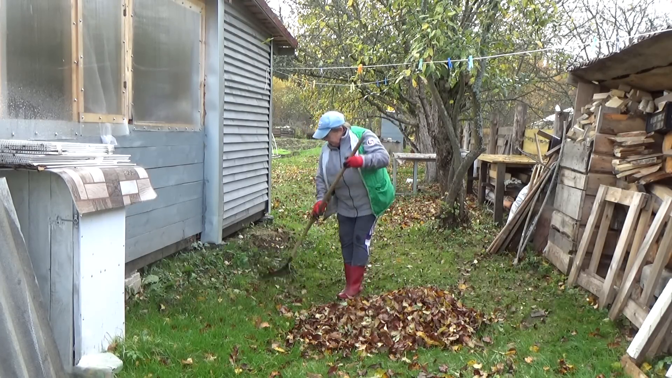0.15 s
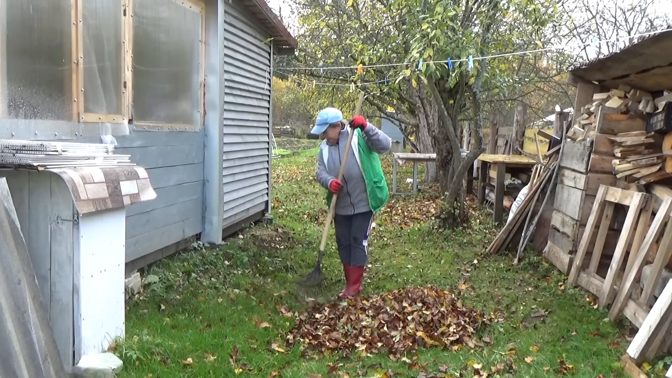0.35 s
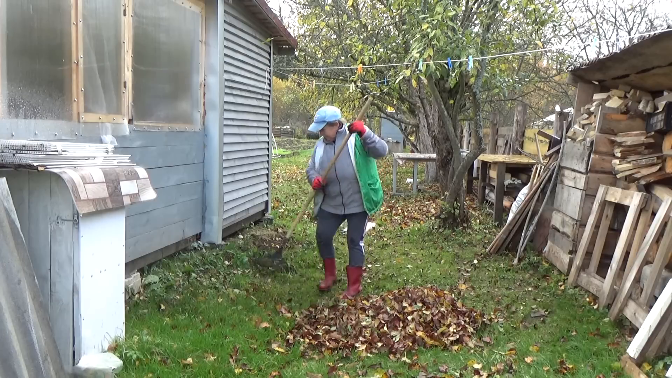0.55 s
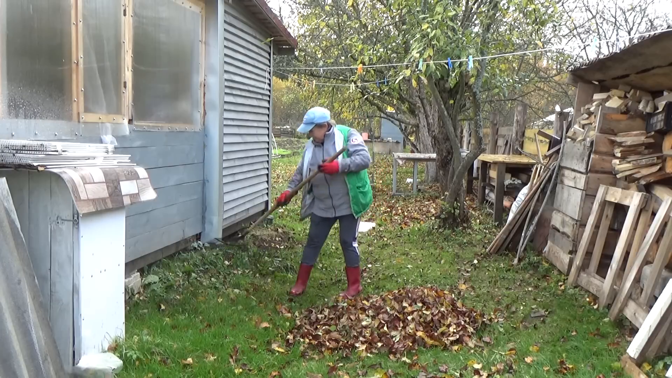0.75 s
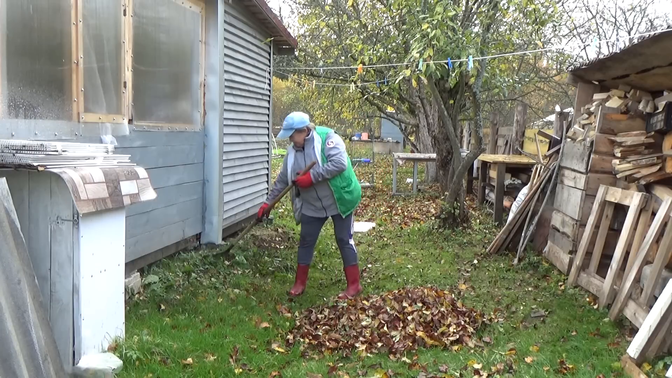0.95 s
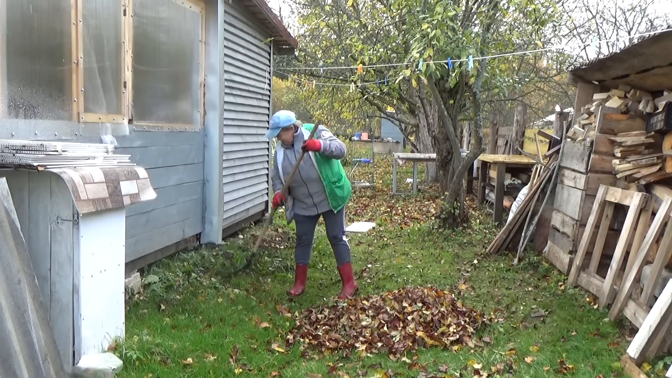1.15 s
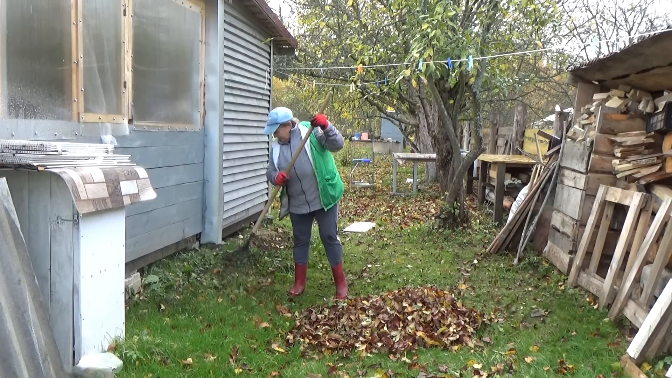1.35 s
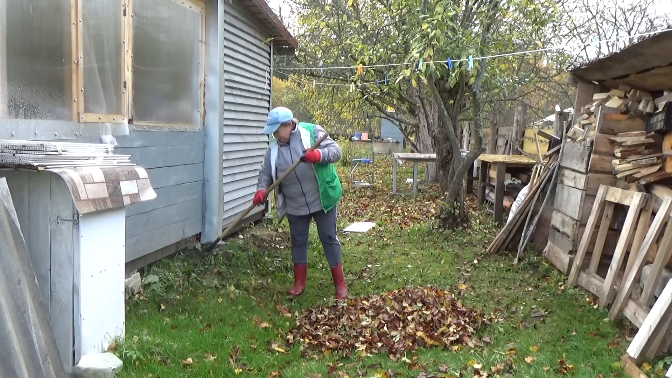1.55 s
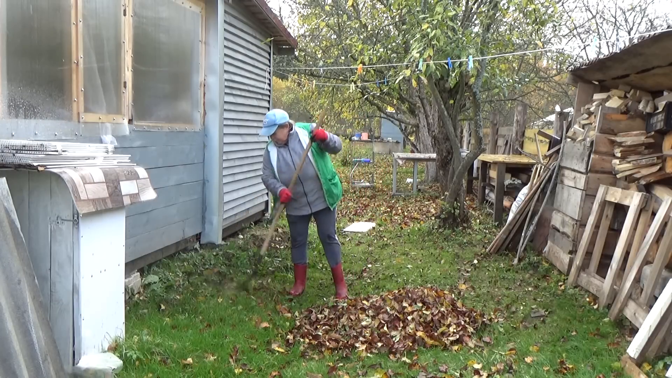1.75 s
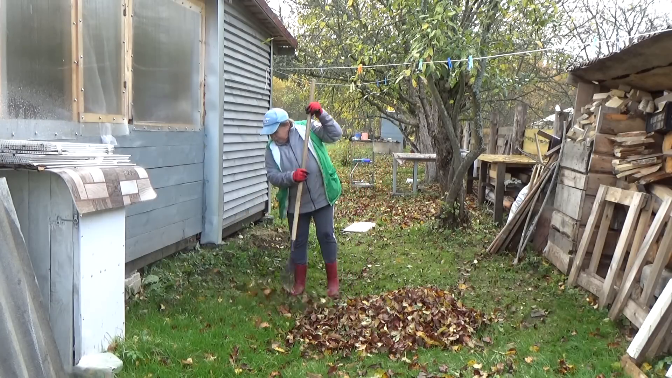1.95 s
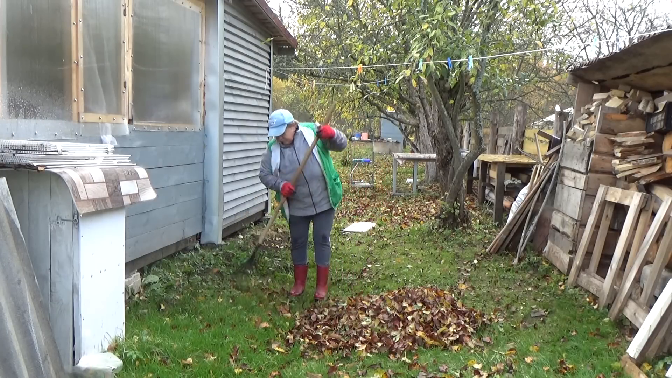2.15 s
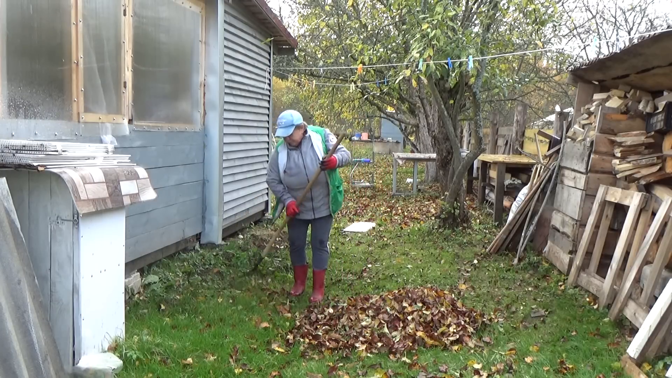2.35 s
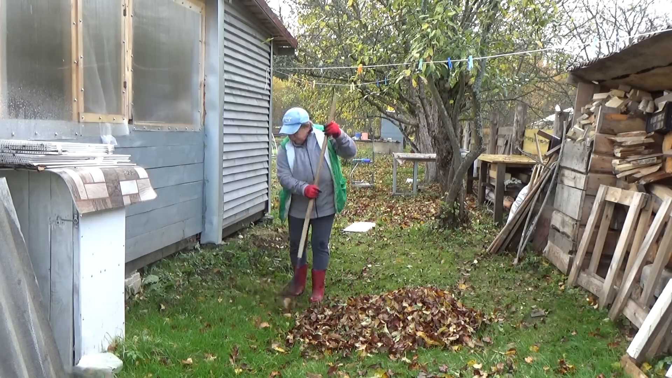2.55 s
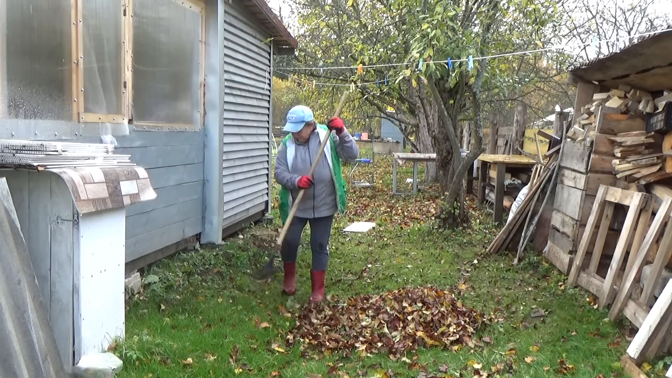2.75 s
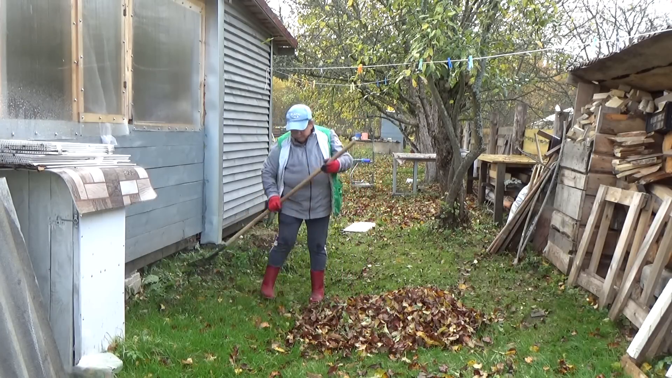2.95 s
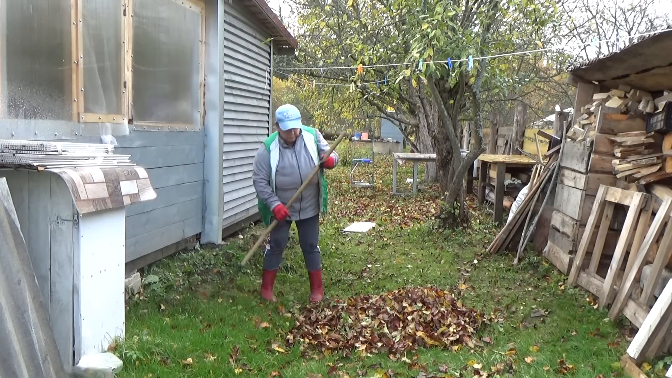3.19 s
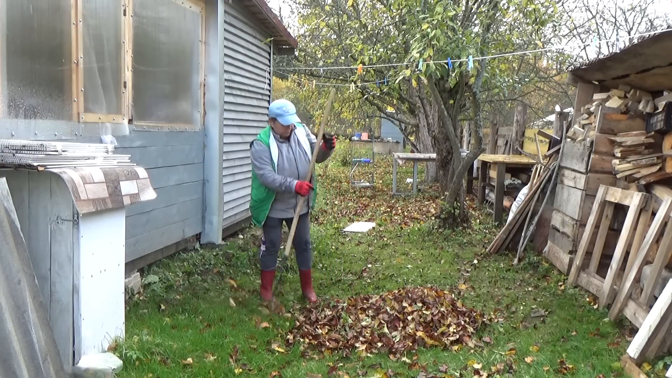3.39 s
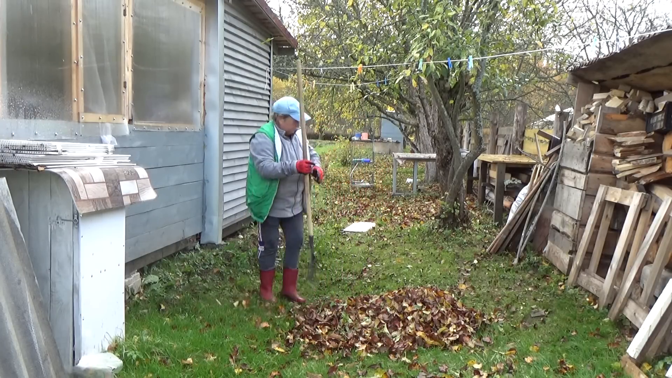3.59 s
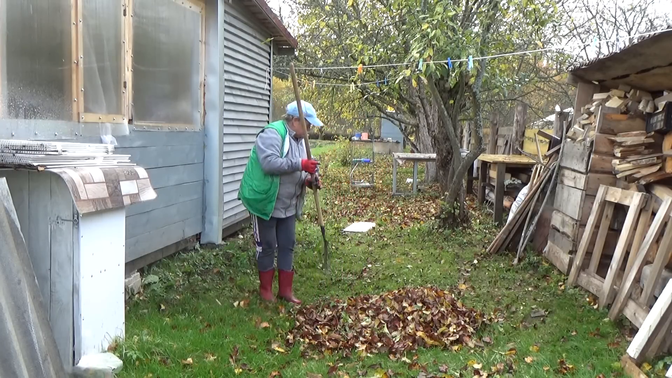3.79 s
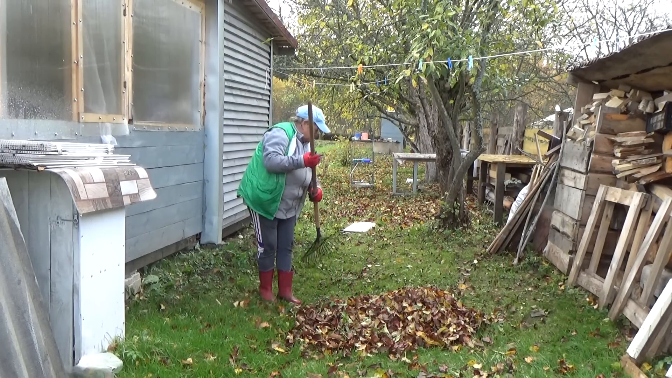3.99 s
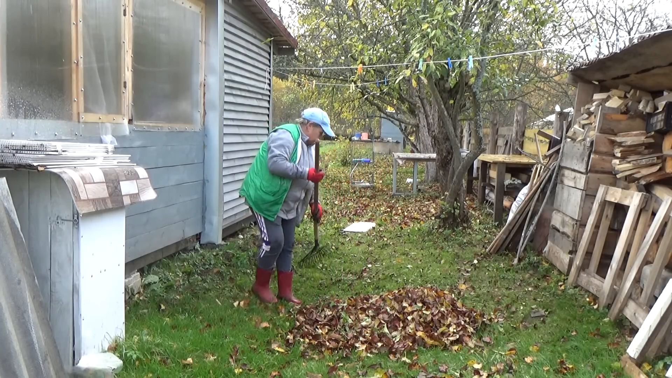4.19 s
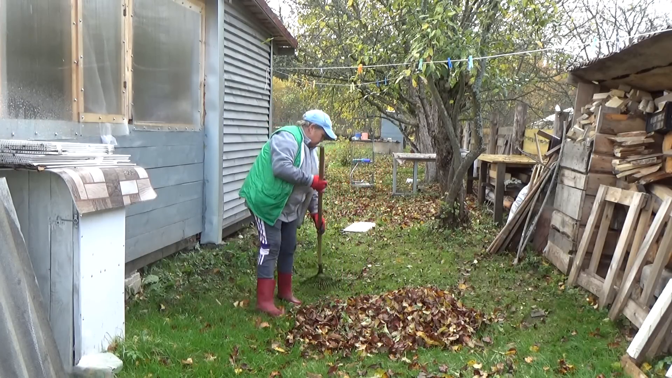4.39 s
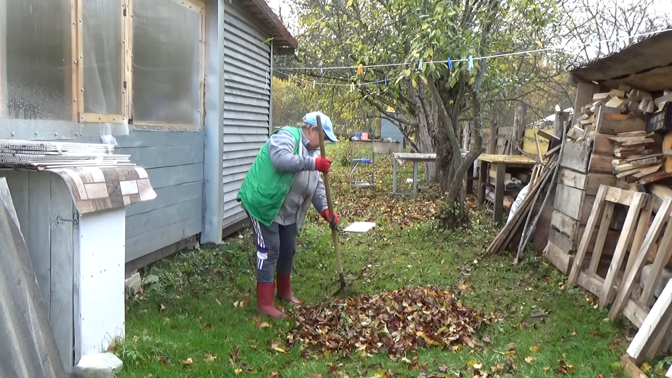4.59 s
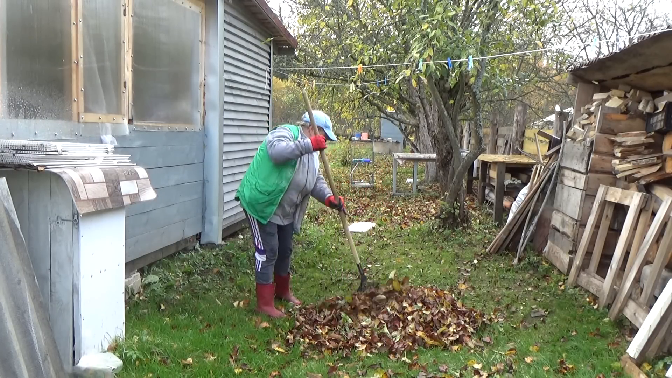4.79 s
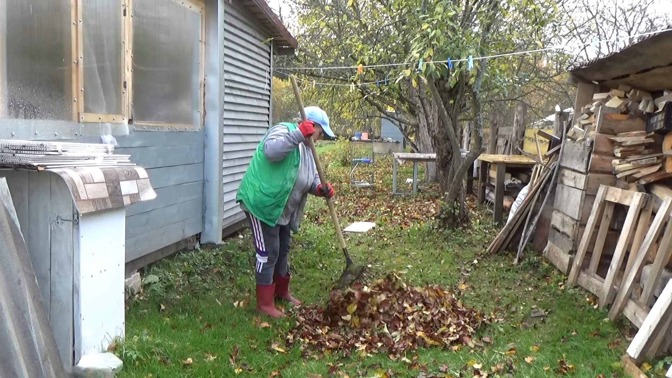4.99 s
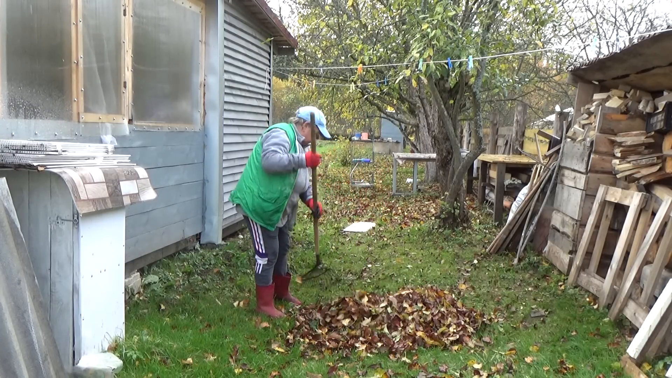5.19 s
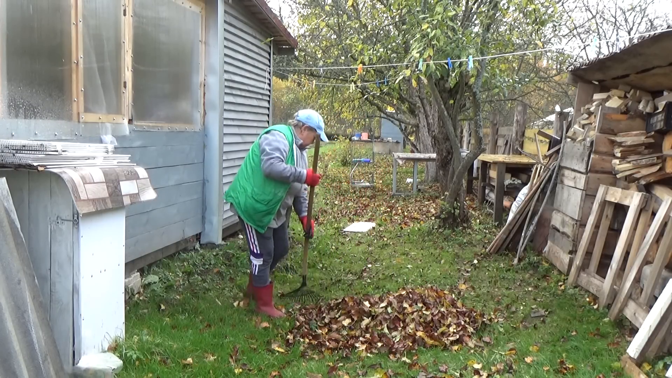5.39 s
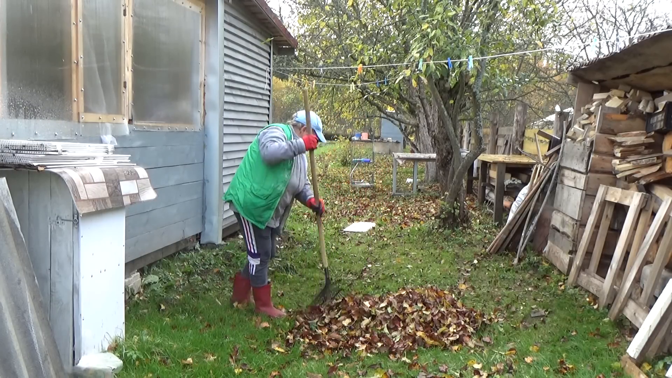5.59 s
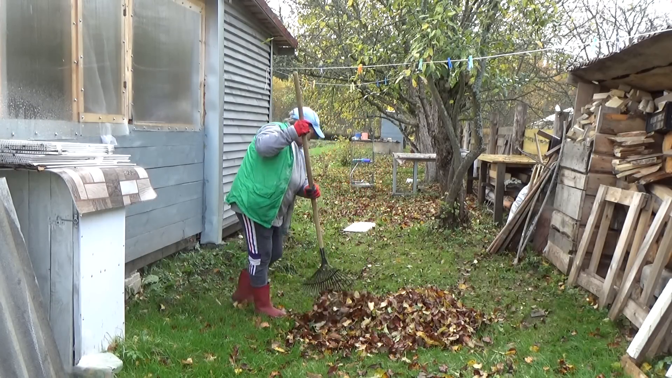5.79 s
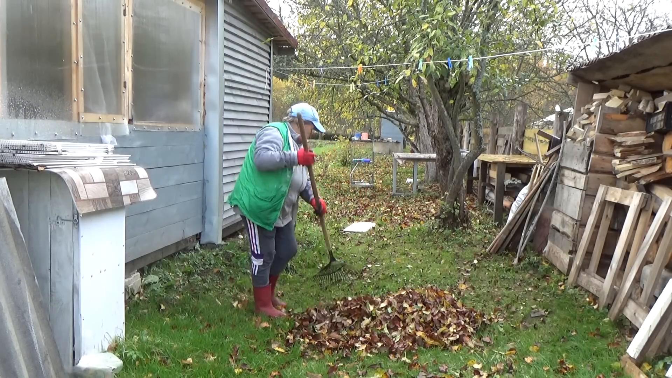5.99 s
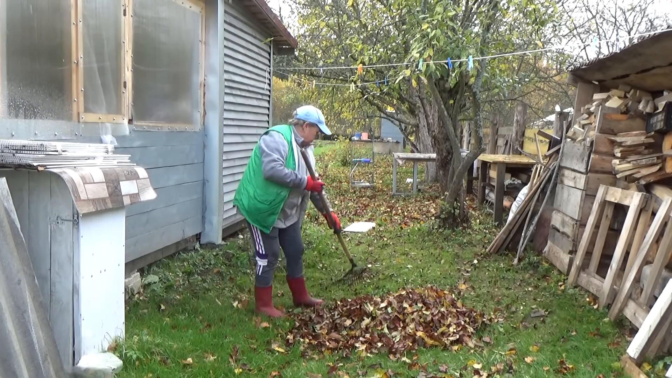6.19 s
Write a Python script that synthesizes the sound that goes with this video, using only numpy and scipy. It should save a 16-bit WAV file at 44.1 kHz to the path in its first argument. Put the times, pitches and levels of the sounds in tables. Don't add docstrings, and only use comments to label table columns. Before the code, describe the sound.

A wire rake scrapes through dry leaves and grass in crisp, crackling strokes, twigs snapping, over faint quiet garden air outdoors.

```python
import sys
import numpy as np
from scipy import signal
from scipy.fft import rfft, irfft, next_fast_len
from scipy.io import wavfile
from scipy.ndimage import uniform_filter1d, map_coordinates

SR = 44100
rng = np.random.default_rng(int(sys.argv[2]) if len(sys.argv) > 2 else 0)


def magnitude_from_level(level_db):
    exponent = np.asarray(level_db, float) / 20
    return 10 ** exponent


def waveform_to_disk(signal):
    frames = np.transpose(np.atleast_2d(signal))
    scaled = np.clip(frames, -1, 1) * 32767
    samples = np.round(scaled).astype(np.int16)
    wavfile.write(sys.argv[1], SR, samples)


N = 275184


def unit(x):
    return x / np.sqrt(np.mean(x ** 2) + 1e-20)


def along(points, hz):
    f, v = np.transpose(points)
    return np.interp(np.log(hz + 1), np.log(f + 1), v)


def wobble(rate):
    knots = rng.standard_normal(int(N * rate / SR) + 4)
    return map_coordinates(knots, [np.arange(N) * rate / SR])


def coloured(x, spectrum):
    m = next_fast_len(N + 8192)
    gain = magnitude_from_level(along(spectrum, np.fft.rfftfreq(m, 1 / SR)))
    return irfft(rfft(x, m) * gain, m)[..., :N]


def patchy(x, depth_db):
    z = signal.stft(x, nperseg=512)[2]
    field = rng.standard_normal(z.shape[1:])
    field = uniform_filter1d(uniform_filter1d(field, size=5, axis=0), size=5, axis=1)
    return unit(signal.istft(z * magnitude_from_level(depth_db * unit(field)), nperseg=512)[1][:, :N])


def grains(seconds, hz, turns, gain, size):
    cycle = hz[:, None] * np.arange(size) / SR
    soft_start = 1 - np.exp(-cycle / 0.46)
    shape = gain[:, None] * np.sin(2 * np.pi * cycle) * np.exp(-cycle / turns) * soft_start
    at = ((seconds * SR).astype(int)[:, None] + np.arange(size)).ravel()
    lean = rng.standard_normal(len(seconds))[:, None]
    return np.array([np.bincount(at, g.ravel(), N + size)[:N] for g in (shape, lean * shape)])


def burst(s, db, hz, t60, width, crack_db):
    t = np.arange(SR // 5) / SR
    b, a = signal.iirpeak(hz, 1 / width, SR)
    crack_band = signal.butter(2, [1200, 9000], "band", fs=SR)
    ring, broad = rng.standard_normal((2, 2, len(t)))
    ring = unit(signal.lfilter(b, a, signal.lfilter(b, a, ring)))
    crack = unit(signal.lfilter(*crack_band, broad))
    decay = magnitude_from_level(db - 60 * (t / t60) ** 0.99)
    onset = 1 - np.exp(-t / 0.00076)
    out = np.zeros((2, N + len(t)))
    start = round(s * SR)
    out[:, start:start + len(t)] = decay * onset * (ring + magnitude_from_level(crack_db) * crack)
    return out[:, :N]


def air():
    # frequency in Hz, level in dB per Hz.
    air_spectrum = [(12, -38), (20, -3), (70, 2), (700, 2.5), (3100, 0.5), (6050, -3), (9710, -5),
                    (15600, -15.5)]
    # frequency in Hz, side minus mid in dB.
    air_width = [(40, -25), (150, -10.5), (600, -2), (2000, -5), (5000, -11.5), (8800, -11), (9600, -15),
                 (11000, -40)]
    breath = magnitude_from_level(-68 + 1.3 * wobble(3.6))
    mid, side = breath * patchy(coloured(rng.standard_normal((2, N)), air_spectrum), depth_db=0.66)
    return np.array([mid, coloured(side, air_width)])


def yard(x):
    # frequency in Hz, decay time t60 in seconds.
    yard_decay = [(200, 0.53), (2000, 0.15), (12000, 0.043)]
    hz, t, z = signal.stft(rng.standard_normal((2, SR // 3)), SR, nperseg=256)
    fade = magnitude_from_level(-60 * t / along(yard_decay, hz)[:, None])
    tail = signal.istft(z * fade, SR, nperseg=256)[1]
    delayed = np.pad(x, (500, 0))[None]
    return signal.fftconvolve(delayed, tail / np.linalg.norm(tail[0]), axes=1)[:, :N]


def boots():
    # start in seconds, peak level in dB, pitch in Hz, decay time t60 in seconds.
    pushes = [
        (0.264, -60, 85, 0.18),
        (.768, -48.5, 280, 0.031),
        (1.712, -48, 480, 0.081),
        (2.545, -49, 403, 0.11),
        (3.04, -63, 62, 0.083),
        (3.219, -63, 185, 0.17),
        (4.64, -55.5, 203, .12),
        (4.7, -45, 526, 0.066),
        (5.566, -56, 88.5, 0.089),
    ]
    return sum(burst(s, db - 2.5, hz, t60, width=0.98, crack_db=-40) for s, db, hz, t60 in pushes)


def snaps():
    # start in seconds, peak level in dB, ring in Hz,
    # decay time t60 in seconds, broad crack in dB re peak.
    twig_snaps = [(0.0648, -38, 1340, 0.039, -21), (0.1088, -42.5, 1480, 0.12, 2),
                  (0.2045, -16.5, 3870, 0.031, -13), (0.2306, -19, 5400, 0.055, -5),
                  (0.7863, -50, 1800, 0.077, -0.5), (0.9326, -41.5, 2580, 0.034, 1.5),
                  (1.047, -46.5, 4500, 0.083, 11.5), (1.3204, -30.5, 3950, 0.047, -6),
                  (1.6392, -48, 5780, 0.037, -8), (1.6814, -34, 3970, 0.079, -2.5),
                  (1.713, -27.5, 4470, 0.085, 4), (2.0489, -44.5, 3270, 0.083, 1),
                  (2.3568, -45.5, 2714, 0.053, 3.5), (2.3952, -33, 3970, 0.054, -5),
                  (2.4231, -32.5, 3080, 0.089, -12), (3.0192, -47, 6060, 0.07, -3),
                  (3.1687, -38.5, 6250, 0.13, -3), (3.2044, -28.5, 5440, 0.047, -2),
                  (4.5291, -35, 4710, 0.093, 0.5), (4.601, -22, 2260, 0.078, -4.5),
                  (4.6794, -23.5, 3850, 0.061, -10), (5.3844, -42, 1770, 0.067, 3.5),
                  (5.4384, -23, 2520, 0.078, -3.5), (5.5494, -28, 4000, 0.043, -17)]
    # start in seconds, peak level in dB, ring in Hz, broad crack in dB re peak.
    leaf_ticks = [(0.4975, -42.5, 2900, 7.5), (.5184, -43, 4300, -3), (0.6355, -38, 4370, -6),
                  (0.9838, -44, 4220, -2), (1.3514, -38, 6200, 0), (1.3753, -39, 3800, -9),
                  (1.516, -48.5, 2750, 4), (1.5915, -46.5, 5900, -3), (1.9472, -39, 3890, -5),
                  (2.1736, -42, 6040, -6), (2.545, -31, 4680, 4.5), (2.6479, -39.5, 6100, 4.5),
                  (2.7292, -47.5, 3730, -8), (2.7541, -42.5, 5980, -12), (3.476, -39.5, 5660, -5),
                  (3.51, -47, 5830, 2), (3.801, -46, 2700, 0), (5.1394, -36, 3670, -10)]
    # start in seconds, peak level in dB, ring in Hz.
    stem_snaps = [(.594, -37, 9300), (.7487, -47, 9190), (.838, -44, 9690), (.9674, -48, 7780),
                  (1.1293, -26, 8850), (1.4272, -43, 8070), (1.5794, -49, 10100), (1.6804, -22.5, 9700),
                  (2.7831, -42, 8190), (3.2594, -35, 11300), (3.5808, -42, 10000), (4.0048, -38, 9220),
                  (4.5745, -29, 9300)]
    ticks = [(s, db, hz, 0.027, crack_db) for s, db, hz, crack_db in leaf_ticks]
    stems = [(s, db, hz, 0.012, -33) for s, db, hz in stem_snaps]
    every = [*twig_snaps, *ticks, *stems]
    return sum(burst(s, db - 10.5, hz, t60, 0.34, crack_db) for s, db, hz, t60, crack_db in every)


def tines():
    # start in seconds, length in seconds, first pitch in Hz, climb in octaves, peak level in dB.
    strokes = [(0.134, 0.16, 1700, 1.87, -42), (1.091, .14, 1950, 0.99, -42.5),
               (1.702, 0.12, 2570, 0.67, -64), (2.39, 0.081, 2900, 0.76, -47.5),
               (3.184, 0.067, 4000, 0.7, -54), (3.877, 0.22, 2940, 0.087, -65.5),
               (4.288, 0.085, 1070, .05, -73), (4.431, .12, 1200, 0.11, -64), (4.43, 0.16, 2216, .02, -57),
               (4.559, .18, 2110, .5, -50.5), (5.43, .14, 1710, 1.01, -44.5)]
    peak = 0.63
    out = np.zeros((2, N))
    for start, length, first_hz, octaves, db in strokes:
        part, detune, chance = rng.random((3, 900))
        hz = first_hz * 2 ** (octaves * part + 0.61 * (detune - 0.5))
        arch_db = -19 * np.where(part < peak, 1 - part / peak, (part - peak) / (1 - peak))
        density_db = 10 * np.log10(length * 1.58)
        gain = magnitude_from_level(db + arch_db + density_db + 7.8 * chance - 0.5)
        out += grains(start + length * part, hz, 8.7, gain, size=400)
    return out


def surges(db, per_depth, lag_s, stretch):
    # peak in seconds, level in dB, # rise in seconds,
    # fall in seconds, depth in the litter in dB.
    pulls = [(0.193, -41.5, .11, 0.073, 4.5), (.255, -38.5, 0.12, .17, -2.5), (1.06, -56, 0.023, 0.079, 18),
             (1.119, -44.5, 0.1, 0.23, 4), (1.213, -41, 0.21, 0.12, -7.5), (1.684, -48, 0.027, 0.068, 0),
             (1.718, -50.5, 0.0087, .05, 8), (1.755, -42.5, 0.065, 0.19, 0.5),
             (1.829, -40, 0.14, 0.098, -3), (2.397, -51.5, 0.038, .06, 4), (2.43, -44.5, .045, .12, -2),
             (2.49, -45, 0.07, 0.18, -1.5), (2.558, -44.5, 0.16, 0.14, -5), (3.172, -50, 0.019, 0.13, -1),
             (3.215, -45.5, 0.063, 0.087, -3), (3.26, -47.5, 0.095, 0.25, -5.5),
             (4.329, -51.5, 0.078, 0.18, -13), (4.53, -52.5, .04, .08, -2), (4.6, -42.5, 0.054, 0.13, -3),
             (4.689, -44.5, 0.1, 0.053, 10.5), (4.72, -51, .05, 0.49, 11), (5.445, -48, 0.025, .08, 5),
             (5.48, -43.5, 0.052, 0.082, -4), (5.539, -46, .08, 0.27, 6)]
    # peak in seconds,
    # level in dB, rise in seconds, fall in seconds, depth in the litter in dB.
    drifts = [(0, -63.5, 0.062, 0.092, 4), (.45, -60.5, 0.23, .45, 2), (.85, -71, 0.4, 0.45, 1),
              (.94, -60.5, 0.046, 0.16, 0), (1.32, -48.5, 0.038, 0.092, -12.5),
              (1.42, -68.5, 0.14, 0.27, 4), (1.642, -56, 0.02, 0.015, 6), (1.911, -53, 0.028, 0.22, -0.5),
              (2.232, -59, 0.43, 0.15, 1.5), (2.72, -70.5, 0.12, .6, 6), (3.03, -64, 0.91, 0.051, 0.5),
              (3.482, -65, .008, .28, -3), (3.67, -66, 0.13, 0.055, -9), (3.805, -64, 0.013, 0.061, 0),
              (4.01, -61, 0.23, 0.32, -5), (4.12, -61, 0.21, 0.032, -9), (4.228, -65.5, 0.049, .03, -2),
              (4.46, -54.5, 0.091, 0.45, 4), (5.05, -59, 0.088, 0.2, 2), (5.156, -59, 0.23, 0.36, 4.5),
              (5.33, -65, 0.12, 0.17, 1), (5.389, -58, .008, 0.087, 3), (5.75, -68, .1, 0.2, 2),
              (6.069, -62.5, 1, 0.11, 0)]
    s, level, rise, fall, depth = np.transpose(np.vstack([pulls, drifts]))[:, :, None]
    t = np.arange(0, N / SR + 1, 1 / 1000)
    late = t - s - lag_s
    away = np.abs(late) / np.where(late < 0, rise, stretch * fall)
    gain = magnitude_from_level(level + db + per_depth * depth - 23.5 * away ** 1.386)
    return np.interp(np.arange(N) / SR, t, np.sqrt(np.sum(gain ** 2, axis=0)))


def crunch(spectrum, centre_hz, turns, spread_db, smooth, count, size):
    when, pitch = rng.random(count), rng.standard_normal(count)
    chance = np.minimum(rng.exponential(size=count), 3)
    hz = np.clip(centre_hz * np.exp(0.45 * pitch), 50, SR / 3)
    grit = unit(grains(when * N / SR, hz, turns, magnitude_from_level(spread_db * chance), size))
    grit = unit(coloured(grit, spectrum))
    hiss = unit(coloured(rng.standard_normal((2, N)), spectrum))
    return patchy(np.sqrt(1 - smooth) * grit + np.sqrt(smooth) * hiss, depth_db=1.66)


def leaves():
    # frequency in Hz, level in dB.
    crackle_spectrum = [(1500, -29), (3000, -8.5), (5000, -2.5), (7500, -4.5), (9800, -4.5), (11500, -12.5),
                        (15800, -47)]
    # frequency in Hz, level in dB.
    sparkle_spectrum = [(8000, -30), (10500, -2.5), (12000, -2.5), (14000, -7), (15800, -14)]
    # frequency in Hz, level in dB.
    leaf_spectrum = [(500, -32.5), (1200, -9), (2200, -4.5), (3500, -4.5), (5000, -13), (8000, -23)]
    # frequency in Hz, level in dB.
    turf_spectrum = [(40, -18), (80, -11.5), (200, -6), (450, -2), (900, 1), (1600, -4), (3000, -56)]
    clumps = magnitude_from_level(0.34 * wobble(35) + 0.55 * wobble(90))
    crackle = magnitude_from_level(0.83 * wobble(60)) * crunch(crackle_spectrum, 6500, turns=0.62, spread_db=0,
                                              smooth=0.51, count=20000, size=48)
    sparkle = magnitude_from_level(0.53 * wobble(49)) * crunch(sparkle_spectrum, 9400, turns=0.97, spread_db=4,
                                              smooth=0.24, count=20000, size=32)
    leaf = magnitude_from_level(0.91 * wobble(29.77)) * crunch(leaf_spectrum, 2863, turns=2.5, spread_db=0,
                                              smooth=0.6, count=10000, size=160)
    turf = magnitude_from_level(0.62 * wobble(12)) * crunch(turf_spectrum, 495.6, turns=4.6, spread_db=0.5,
                                           smooth=0.75, count=3000, size=500)
    sparkle *= magnitude_from_level(-3 * (np.arange(N) / SR > 4.25))
    litter = surges(db=0.04, per_depth=0.0085, lag_s=0.0015, stretch=1.03) * crackle
    litter += surges(db=-9.5, per_depth=-0.37, lag_s=0.02, stretch=0.62) * sparkle
    litter += surges(db=-4.5, per_depth=0.54, lag_s=0.0469, stretch=0.76) * leaf
    litter += surges(db=-12.5, per_depth=0.64, lag_s=0, stretch=0.98) * turf
    return clumps * litter


def scene():
    # frequency in Hz, side minus mid in dB.
    image_width = [(40, -35), (200, -19), (1700, -16), (2800, -12), (5400, -15), (8900, -12.5),
                   (9500, -23.5), (16000, -17)]
    # frequency in Hz, level in dB.
    woodpile = [(700, -65), (2300, -30), (5000, -29), (8000, -48)]
    hits = snaps() + boots() + tines()
    mid, side = leaves() + hits + magnitude_from_level(-12.5) * yard(hits[0])
    side = coloured(side, image_width) + coloured(mid, woodpile)
    mid, side = np.array([mid, side]) + air()
    return np.array([mid - side, mid + side])


def narrowed(x, under_db):
    z = signal.stft(np.array([x[0] + x[1], x[0] - x[1]]) / 2, nperseg=2048)[2]
    power = np.abs(z[:, :1024]).reshape(2, 128, 8, -1) ** 2
    mid_power, side_power = power.sum(axis=2)
    keep = side_power > magnitude_from_level(2 * under_db) * mid_power
    z[1, :1024] *= np.repeat(keep, 8, axis=0)
    mid, side = signal.istft(z, nperseg=2048)[1][:, :N]
    return np.array([mid + side, mid - side])


def top_cut(x):
    return signal.sosfilt(signal.butter(12, 15740, fs=SR, output="sos"), x)


def record(dry):
    # frequency in Hz, level in dB.
    mic_response = [(10, -12), (25, 0), (15720, 0), (15900, -90)]
    mix = narrowed(coloured(dry, mic_response), under_db=-17)
    return top_cut(mix)


dry = scene()
out = record(dry)
waveform_to_disk(out)
```